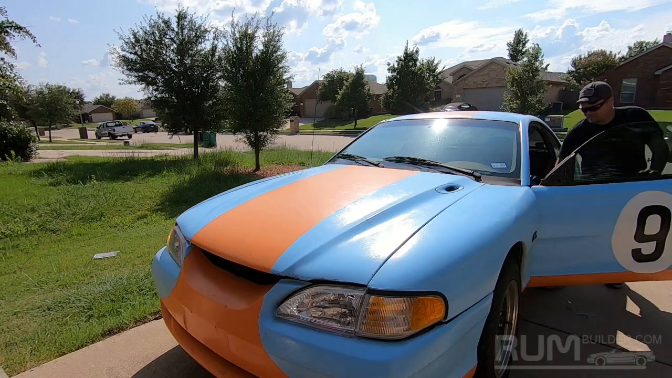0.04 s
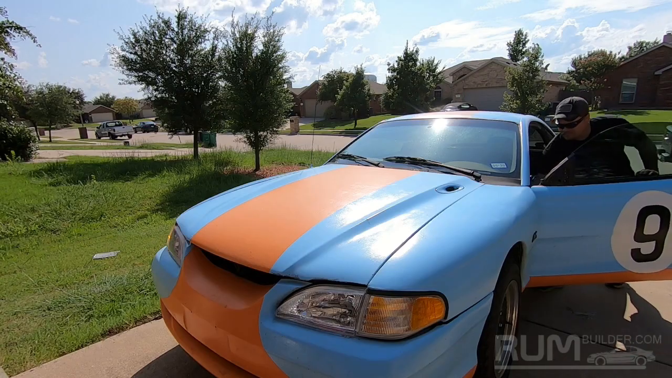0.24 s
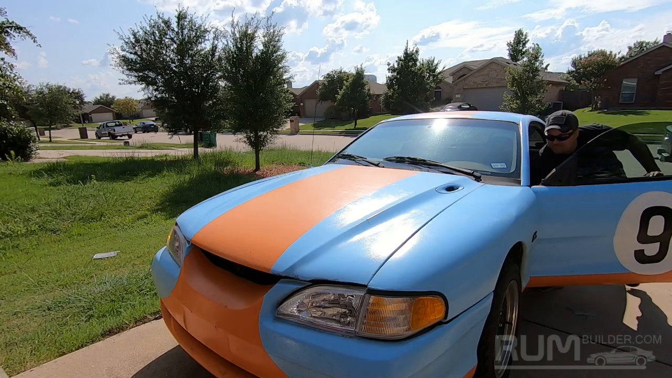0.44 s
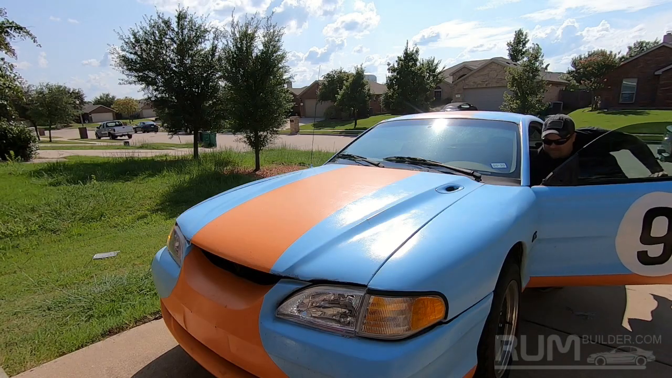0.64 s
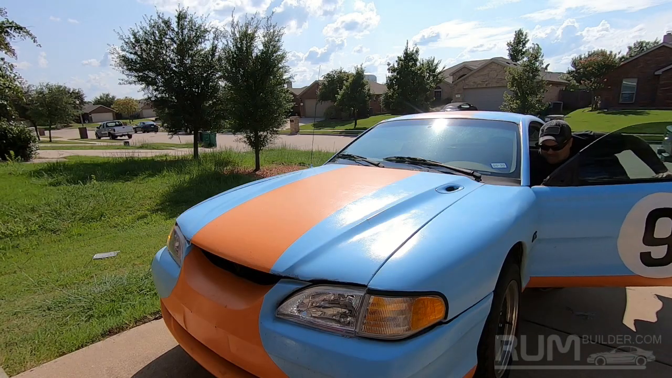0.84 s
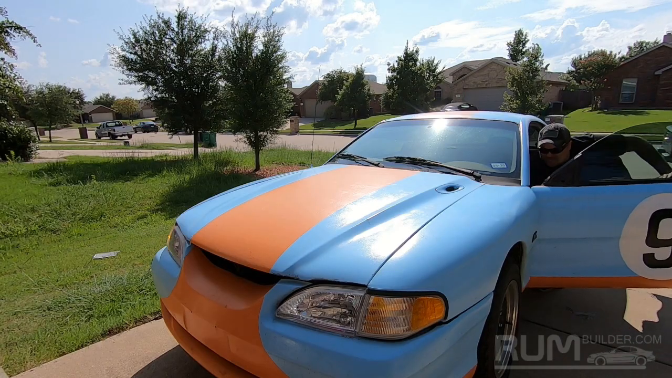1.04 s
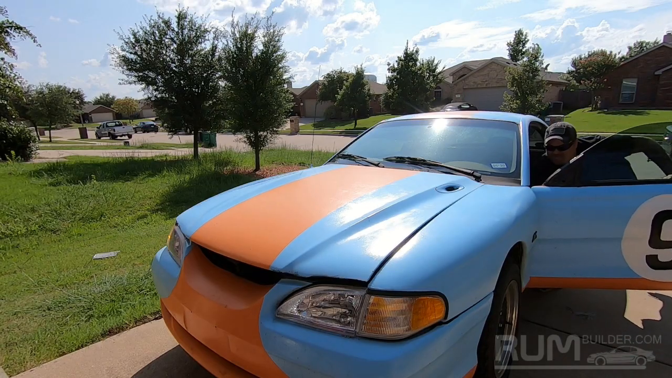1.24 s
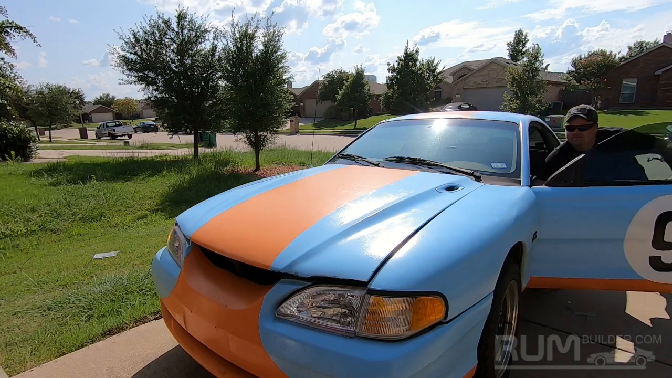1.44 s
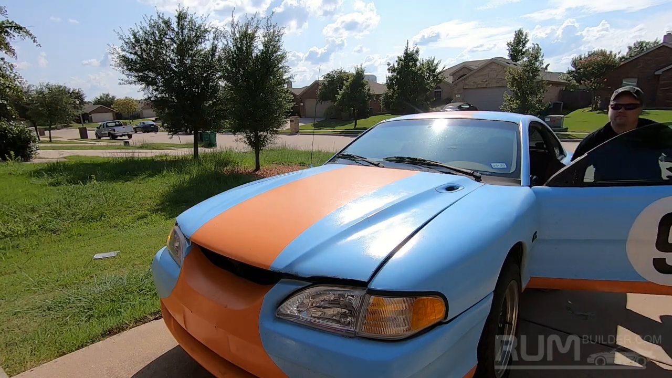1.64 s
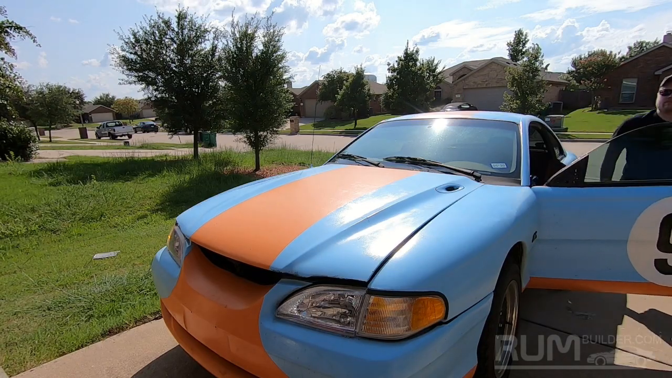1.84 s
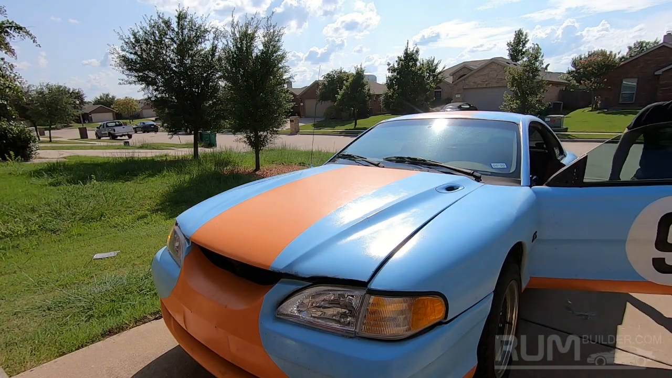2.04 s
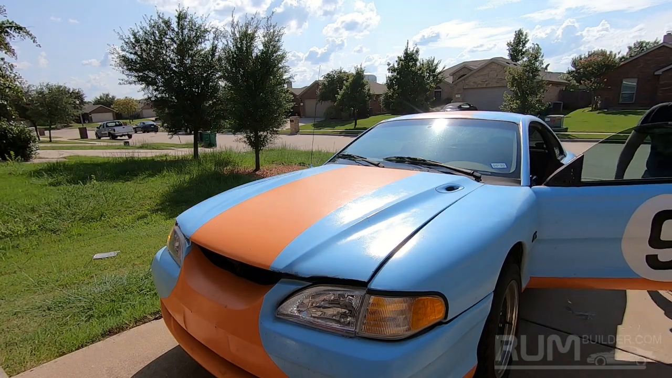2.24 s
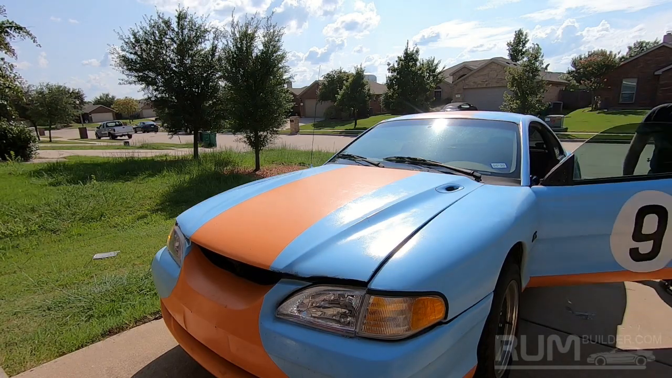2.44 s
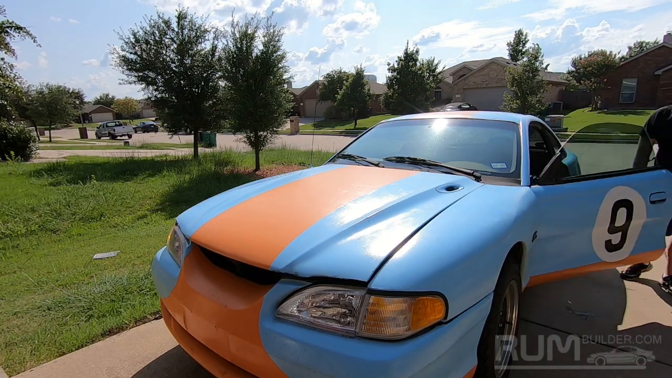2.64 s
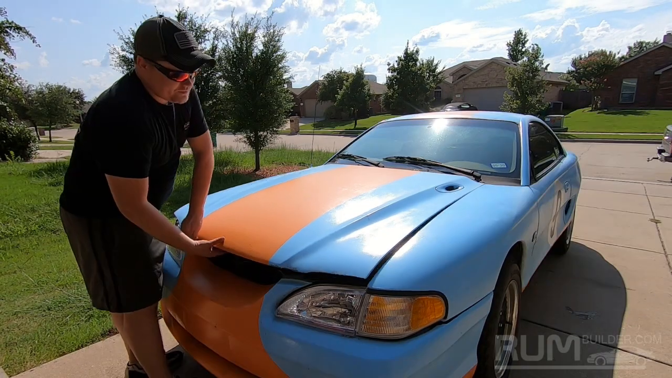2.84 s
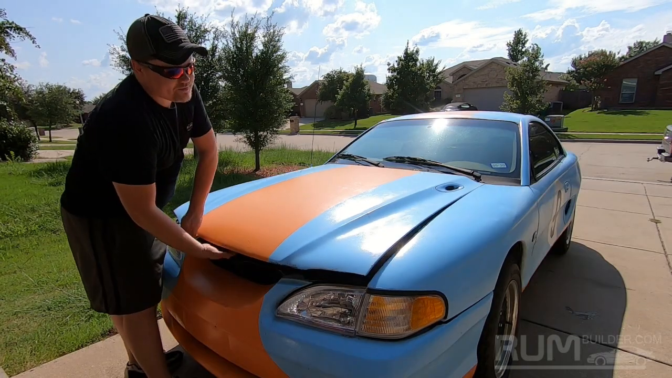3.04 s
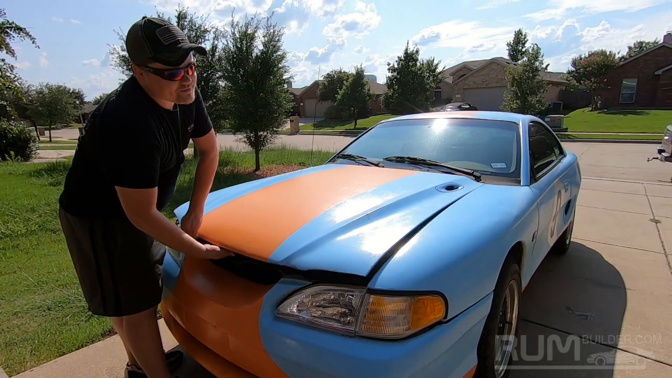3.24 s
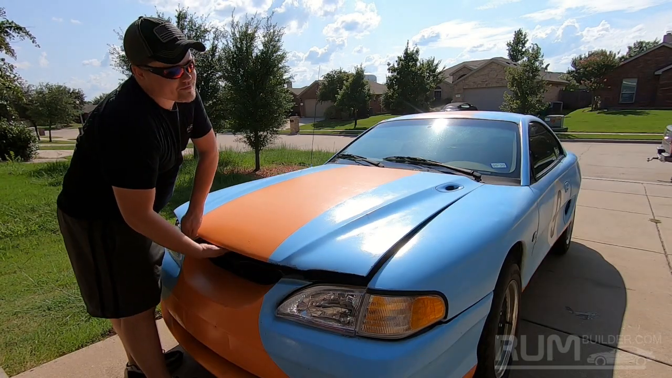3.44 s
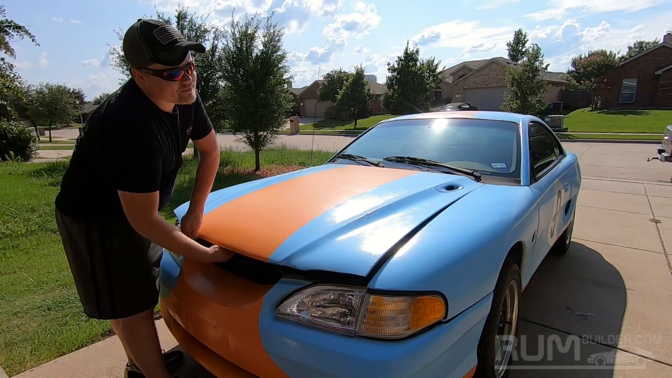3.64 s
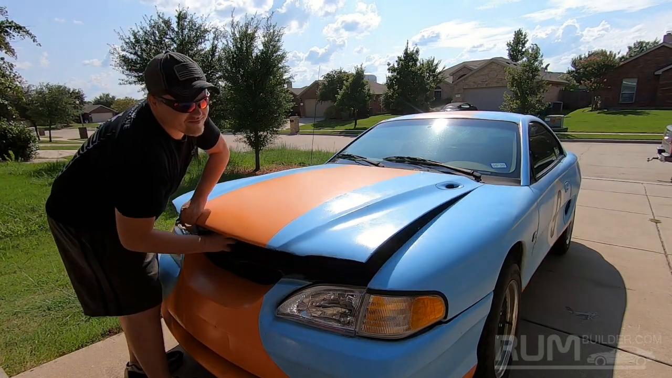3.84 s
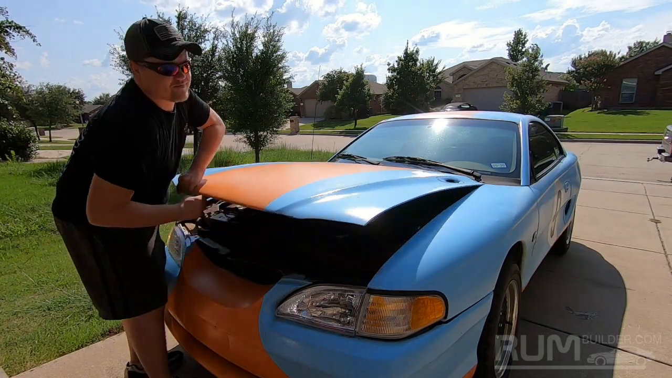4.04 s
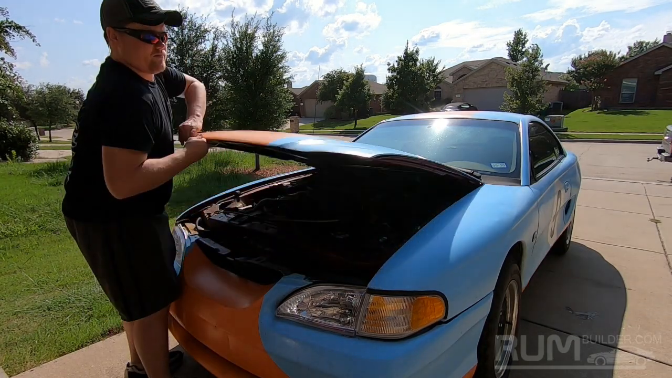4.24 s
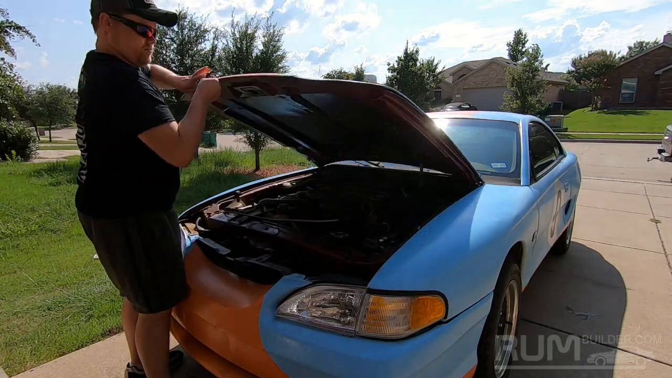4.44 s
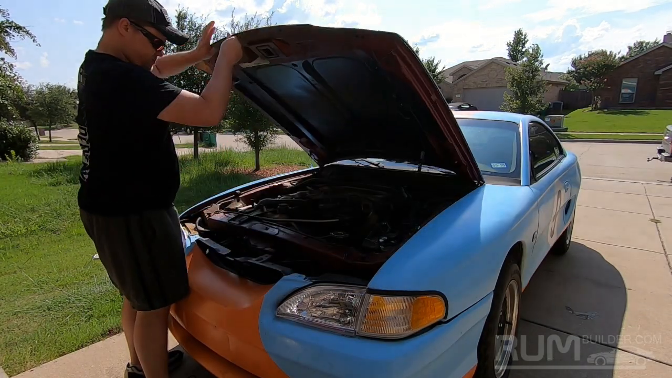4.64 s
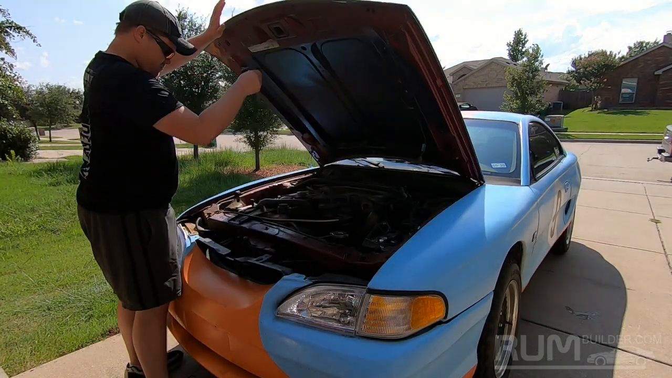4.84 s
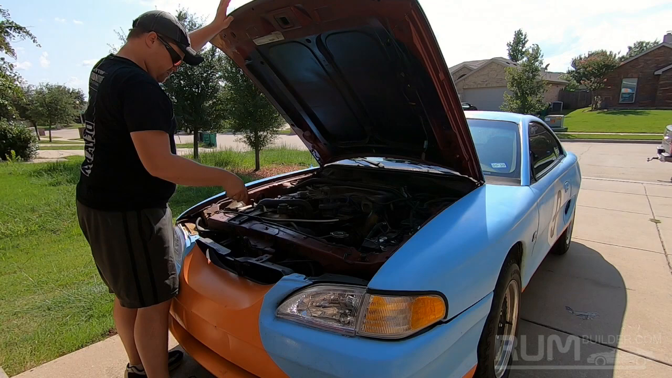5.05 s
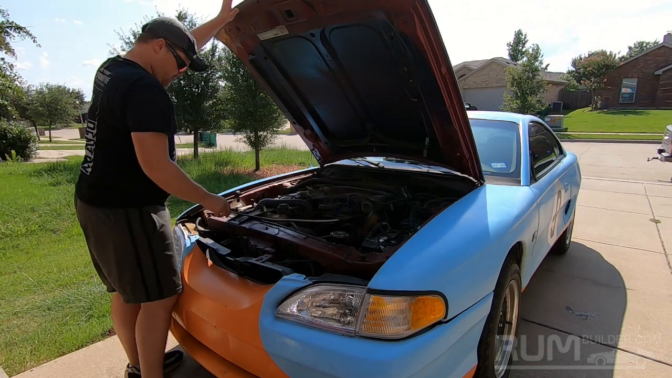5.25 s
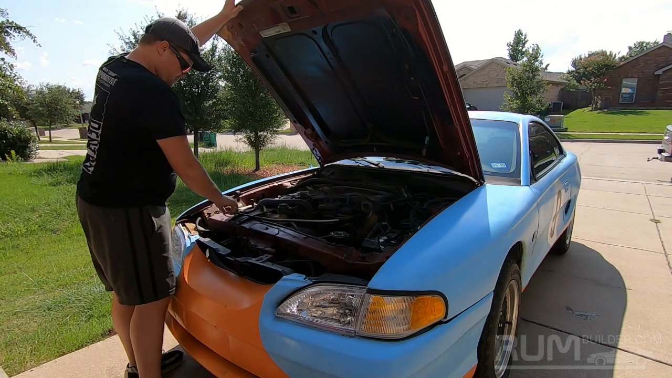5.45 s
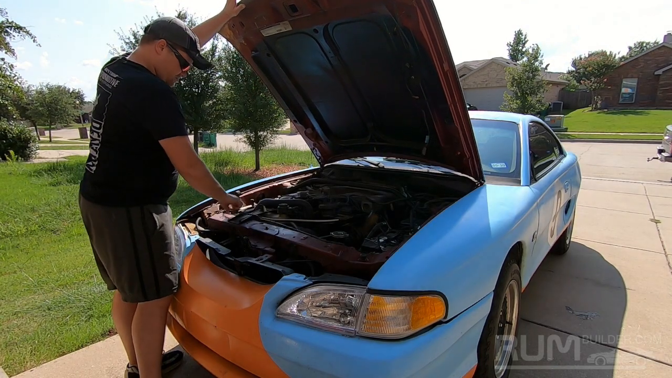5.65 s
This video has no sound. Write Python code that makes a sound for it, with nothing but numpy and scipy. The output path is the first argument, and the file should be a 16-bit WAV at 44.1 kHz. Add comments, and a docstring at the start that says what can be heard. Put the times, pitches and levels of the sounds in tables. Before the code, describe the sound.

Quiet drive with faint far traffic, low hum and soft wind rumble. Small dull touches on a car sill, then a short cable scrape and one very loud steel latch bang with a shivering spring. Soft door bumps follow, then a second, weaker clunk and rattle. Fingers fumble at the safety catch with knocks and thin squeaks; finally a prop rod clicks. Close single-microphone sound, almost mono.

```python
"""Opening a car bonnet

A car stands on a quiet suburban drive. Its release cable is pulled and the latch springs open with a bang;
then hands rattle the bonnet on its safety catch, lift it and free the prop rod. Random shakes drive resonances
for the knocks, and uneven slips do so for the rubbing; squeaks are gliding tones. Shaped noise makes far
traffic, hum, insects and gusts, beside a drone; houses answer with a fading noise tail."""
import sys
import numpy as np
from scipy import signal
from scipy.fft import rfft, irfft, next_fast_len
from scipy.io import wavfile
from scipy.ndimage import map_coordinates

SR = 44100
rng = np.random.default_rng(int(sys.argv[2]) if len(sys.argv) > 2 else 0)


def pcm_store(signal):
    """Save signal as 16-bit PCM."""
    levels = np.round(np.clip(np.atleast_2d(signal), -1, 1) * 32767)
    wavfile.write(sys.argv[1], SR, levels.astype(np.int16).T)


N = 251491

# Spectra of the steady sounds, relative: (f/Hz, level/dB per Hz)
TRAFFIC_SPECTRUM = [(20, -4), (40, -10.5), (60, -13.5), (110, -12.5), (200, -19.5), (400, -17), (800, -18),
                    (1200, -20.5), (1700, -27.5), (3000, -32.5), (6000, -36), (15800, -43)]
GUST_SPECTRUM = [(1, -4.5), (3, 3), (8, -12), (20, -33.5), (40, -47.5), (80, -120)]
SIDE_HISS_SPECTRUM = [(15, -62), (25, -17), (4450, -10.5), (5670, -6), (12100, -4), (15800, -9.5)]
# How loud the air sounds are over time: (t/s, level/dB)
DRONE_LEVEL = [(0, -58), (1, -62), (2, -64.5), (2.69, -62.5), (2.75, -68), (4, -62), (4.3, -60.5),
               (5.7, -58.5)]
INSECT_LEVEL = [(0, -86), (2.5, -83.5), (3.6, -102), (5.7, -88)]
GUST_LEVEL = [(0, -39.5), (0.3, -54), (0.97, -32.5), (1.22, -46.5), (1.45, -33), (2.02, -36.5),
              (2.14, -47.5), (2.75, -41), (2.86, -54.5), (3.13, -33.5), (3.37, -36.5), (3.76, -43),
              (3.91, -49.5), (4.6, -37.5), (5.03, -60.5), (5.7, -58.5)]
# Bands of hum above the drone: (f/Hz, width/Hz, level/dB)
HUM_BANDS = [(149, 8, -0.5), (237.2, 10, -4.5), (289, 2.5, -7), (745, 20, -12.5)]
# How fast the answer of the houses fades by 60 dB: (f/Hz, t60/s)
HOUSE_FADE = [(100, .5), (600, 0.46), (2000, 0.37), (6000, 0.33), (14000, 0.33)]
# Treble-leaning difference of the two channels: (f/Hz, side level re mid/dB)
CHANNEL_DIFFERENCE = [(25, -45), (1000, -53.5), (4000, -35.5), (12000, -28)]
# Single contacts: (t/s, middle steel level/dB, dullness = low steel over middle/dB,
# panel level/dB, panel thud level/dB)
SILL_HITS = [(0.0266, -59, 2.1, -61, -55), (0.0828, -59, 5.6, -35, -51.5), (0.1236, -73, 1.5, -52.5, -49),
             (0.1744, -72, 7, -46, -63)]
LATCH_HITS = [(1.1655, -9.5, 1.5, -19.5, -26.5), (1.3337, -50, 8, -32, -55), (1.3786, -43.5, 1.5, -37, -81),
              (1.4477, -61, 9.5, -40.5, -49.5), (1.4741, -62, 9, -45.5, -54), (2.8047, -46, 1, -45, -48.5),
              (2.88, -29.5, 6.5, -24, -41), (3.0496, -71.5, 3, -57, -46)]
DOOR_HITS = [(1.6502, -61.5, 8.7, -44, -56.5), (1.8423, -58, 4, -64.5, -62.5),
             (2.0911, -73, 1.6, -40.5, -50), (2.6284, -68, 1.7, -50.5, -51),
             (3.3116, -73.5, 9.6, -51.5, -60.5)]
CATCH_HITS = [(3.394, -50.5, 5.5, -40, -49.5), (3.7579, -55.5, 5.5, -46, -58), (3.7875, -65, 8, -69, -79),
              (3.8144, -63, 10, -53, -81), (3.8725, -39.5, -4.5, -43, -53), (3.905, -56, 9, -47, -47.5),
              (4.02, -59, 11, -41.5, -67), (4.035, -60, 14.5, -43, -52.5), (4.1106, -45.5, 11, -44, -59),
              (4.2105, -32.5, -9, -47, -68), (4.229, -47, -7.5, -57, -55)]
ROD_HITS = [(4.6513, -59.5, -3, -62, -60), (4.8994, -68, -2.5, -67.5, -61),
            (5.1873, -63.5, -7, -65.5, -68.5), (5.2599, -39.5, 0.5, -36, -65), (5.2655, -40.5, 2, -37, -70),
            (5.283, -48, -8, -52, -70)]
# Rattles of the bonnet on its hook: the five contact columns for the first touch, then
# what each rebound loses: (steel loss/dB, panel loss/dB, thud loss/dB)
LATCH_RATTLES = [(1.1754, -26, 1.5, -22.5, -34, 4.5, 11, 4),
                 (2.8875, -32.5, 1.2, -26, -35.5, 3.1, 1.5, 0.5)]
CATCH_RATTLES = [(3.938, -55.5, 14, -25.5, -37, 14, 8.7, 6.7)]
# Resonances of each part, relative: (f/Hz, width/Hz, level/dB)
SILL_TRIM = [(132, 67, -1), (243, 74, 3), (376, 110, 2.5), (476, 145, -2), (730, 110, -6),
             (1330, 210, -5.5)]
LATCH_STEEL = [(1518, 24, -6.5), (1643, 24, 9), (1793, 62, 4.5), (2040, 110, 3.5), (2097, 130, -2.5),
               (2550, 70, 5), (2846, 77, -4.5), (3570, 450, 0.5), (4030, 62, -1), (4120, 66, 3.5),
               (4640, 92, -8), (6204, 59, -8.5), (7080, 400, -0.5), (7700, 75, -7), (8600, 600, -3.5),
               (9400, 57, -3), (13120, 480, -8.5), (13700, 300, -10)]
CLOSED_BONNET = [(85, 80, -14.5), (135, 72, -9.5), (218, 60, -10), (325, 88, -6.5), (564, 51, -4.5),
                 (638, 45, -7.5), (755, 38, 1.5), (788, 100, 0), (897, 180, -4), (1081, 58, -1.5)]
LATCH_SPRING = [(1910, 200, 2), (2050, 200, 2.5), (590, 400, -1), (4200, 350, -9.5)]
DOOR_SKIN = [(129, 97, 5.5), (224, 97, 6), (385, 22, 9), (484, 54, -1.5), (704, 520, -8), (1250, 1800, -60)]
CATCH_STEEL = [(1610, 190, -3.5), (2090, 170, 4.5), (2403, 580, -6.5), (2990, 120, 3.5), (3830, 310, -10),
               (4800, 860, 1.5), (5270, 63, -13), (6690, 120, 9.5), (7540, 240, -0.5), (8510, 180, 4.5),
               (10887, 69, -20)]
LIFTED_BONNET = [(85, 40, -5), (154, 48, -2), (185, 32, -2.5), (246, 40, -1.5), (323, 38, -3.5),
                 (406.7, 13.6, 3), (503, 34, -2.5), (591, 34, -1.5), (965, 270, -9), (1058, 37, -4.5),
                 (1530, 1200, -12.5)]
ROD_STEEL = [(1763, 90, 0), (3300, 52, -8), (4210, 118, -2), (4550, 39, -9.5), (4650, 61, 7),
             (6660, 32, -13), (7280, 77, -10), (7850, 57, -12)]
ROD_CLIP = [(197.8, 383, -30), (570, 470, -13), (1010, 99, 13)]
# Spectra of the shakes for middle, low and high steel, panel and thud, one list each: (f/Hz, level/dB)
SHAKE_SPECTRA = [
    [(2300, -31), (3000, 2), (6000, -6), (7500, -30)],
    [(1000, -30.5), (1350, 2), (3000, -3), (3900, -32.5)],
    [(4800, -31), (6000, 3.5), (11000, -3), (14000, -8), (16000, -17)],
    [(190, -31), (280, -1.5), (1350, -2), (2500, -28), (5000, -61)],
    [(30, -18), (60, 0), (280, 4), (420, -31.5), (2000, -83)],
]
# Rubbing strokes: (start t/s, end t/s, first level/dB, last level/dB)
CABLE_STROKES = [(1.1, 1.168, -58.5, -37.5), (2.79, 2.855, -58, -57), (2.86, 2.882, -49.5, -34.5)]
SPRING_STROKES = [(1.19, 1.64, -48.5, -66)]
FINGER_STROKES = [(3.735, 3.8, -59.5, -61.5), (3.83, 3.94, -61, -55), (4.0, 4.18, -65, -66),
                  (4.185, 4.21, -55.5, -51), (4.22, 4.38, -69, -64.5)]
# Whining dry pivots: (start t/s, length/s, level/dB, first f/Hz, last f/Hz)
SQUEAKS = [(3.813, 0.061, -65, 7400, 7600), (3.818, 0.051, -62, 8150, 8350), (4.016, .09, -70, 6600, 6640),
           (4.202, 0.23, -62, 4780, 4300), (4.214, 0.227, -71, 6620, 6500), (4.289, 0.13, -60, 2500, 2970),
           (4.293, 0.094, -63, 2230, 2360), (4.36, 0.134, -64, 2290, 2140)]

TOP_HZ = 15800  # band limit
TRAFFIC_DB, SWELL_DB = -60, 0.7  # mean level of the far road, size of its swell
DRONE_HZ = 74  # middle of its wandering pitch
REBOUNDS, REBOUND_S = 3, 0.019  # rebounds per rattle, time between them
STROKE_EDGE_DB_PER_S = 1500  # how fast a stroke sets in and lets go
POP_S, POP_DB, POP_DECAY_S = 2.6931, -40, 0.009
HIGH_DULLS, HIGH_GROWS = 0.27, 0.12  # dB the high steel loses per dB of dullness and per dB of weaker blow
CRACK_T60 = 0.008  # fade time of the first hard touch of bare metal, s


def amp(db):
    """Turn decibels into gain."""
    return 10 ** (np.asarray(db) / 20)


def unit(x):
    """Scale a sound to rms 1."""
    return x / np.sqrt(np.mean(x ** 2) + 1e-20)


def along(points, hz):
    """Read values between (f/Hz, value) points on a log axis."""
    f, v = np.transpose(points)
    return np.interp(np.log(hz + 1), np.log(f + 1), v)


def gain_over_time(points):
    """Turn (t/s, level/dB) points into one gain per sample."""
    s, db = np.transpose(points)
    return amp(np.interp(np.arange(N) / SR, s, db))


def wobble(rate):
    """A smooth random curve through 'rate' random points a second."""
    knots = rng.standard_normal(int(N * rate / SR) + 4)
    return map_coordinates(knots, [np.arange(N) * rate / SR])


def filtered(x, response):
    """Reshape x by a complex response to frequency."""
    m = next_fast_len(x.shape[-1] + 8192)
    spectrum = rfft(x, m) * response(np.fft.rfftfreq(m, 1 / SR))
    return irfft(spectrum, m)[..., :x.shape[-1]]


def modes(table):
    """A body answers a push most strongly at its resonances, and only after the push."""
    def response(f):
        total = 0
        for k, (centre, width, db) in enumerate(table):
            damping = 1j * f * width
            total = total + (-1) ** k * amp(db) * damping / (centre ** 2 - f ** 2 + damping)
        return total
    return response


def noise(response):
    """Coloured noise of rms 1."""
    return unit(filtered(rng.standard_normal(N), response))


def contacts(table, steel, panel, carpet_db, hard_s, soft_s, steel_t60, panel_t60, crack_db):
    """Each contact chatters briefly and rings three groups of steel modes; another shake rings the panel."""
    out, t = np.zeros(N + SR), np.arange(SR // 4) / SR
    f, start = np.fft.rfftfreq(SR // 2, 1 / SR), slice(0, SR // 80)
    spectra = np.array([amp(along(g, f)) for g in SHAKE_SPECTRA])
    cushion = modes(panel)(f) / (1 + 1j * f / 2500) ** 2  # a cushioned blow carries little treble
    knock = cushion * (1j * f / (200 + 1j * f)) ** 2  # the panel's knock lies above its thud
    thud = cushion / (1 + 1j * f / 300) ** 2
    lives = np.array([steel_t60, 1.4 * steel_t60, 1.2 * steel_t60, panel_t60, 1.1 * panel_t60])
    rises = np.array([hard_s, hard_s, hard_s, soft_s, 2 * soft_s])
    envelope = amp(-60 * t / lives[:, None]) * (1 - np.exp(-t / rises[:, None]))
    push = 1.3 * t / soft_s * np.exp(1 - t / soft_s)  # the blow itself
    for s, steel_db, dull_db, panel_db, thud_db in table:
        high_db = steel_db - HIGH_DULLS * dull_db + HIGH_GROWS * steel_db
        levels = [steel_db, steel_db + dull_db, high_db, panel_db, thud_db]
        rough = irfft(rfft(rng.standard_normal((5, SR // 2))) * spectra)[:, :len(t)]
        shakes = rough * envelope
        shakes[:3] *= 1 + amp(crack_db - 60 * t / CRACK_T60)
        shakes[3:] += push * np.std(rough[3:], axis=1, keepdims=True)
        # random scatter: no two blows land alike
        struck = [(hz, width, db + rng.normal(0, 2.5)) for hz, width, db in steel]
        ring = modes(struck)(f) + amp(carpet_db)  # named modes stand on a dense carpet of small ones
        parts = irfft(rfft(shakes, SR // 2) * [ring, ring, ring, knock, thud])
        # over its first 1/80 s each part lies 5 dB below its table level
        parts *= amp(np.subtract(levels, 5))[:, None] / np.std(parts[:, start], axis=1, keepdims=True)
        out[round(s * SR):][:SR // 2] += parts.sum(axis=0)
    return out[:N]


def rattled(table):
    """A rattle is a first contact and evenly spaced rebounds that each lose a little."""
    hits = []
    for s, steel_db, dull_db, panel_db, thud_db, steel_loss, panel_loss, thud_loss in table:
        for k in range(REBOUNDS + 1):
            hits.append((s + k * REBOUND_S, steel_db - k * steel_loss, dull_db,
                         panel_db - k * panel_loss, thud_db - k * thud_loss))
    return hits


def strokes(table):
    """Each stroke sets in fast, drifts from its first level to its last and lets go."""
    t, total = np.arange(N) / SR, np.zeros(N)
    for start, end, first_db, last_db in table:
        outside_s = np.maximum(0, np.maximum(start - t, t - end))
        drift_db = np.interp(t, [start, end], [first_db, last_db])
        total += amp(drift_db - STROKE_EDGE_DB_PER_S * outside_s)
    return total


def rubbing(table, body, lumpy_db, carpet_db):
    """Uneven slips excite a body's resonances, with the treble softened."""
    slips = rng.standard_normal(N) * amp(lumpy_db * wobble(130))
    rubbed = filtered(slips, lambda f: (modes(body)(f) + amp(carpet_db)) / (1 + (f / 6500) ** 4))
    return strokes(table) * unit(rubbed)


def traffic():
    """A far road: mostly low noise that swells slightly."""
    return amp(TRAFFIC_DB + SWELL_DB * wobble(3.0)) * noise(lambda f: amp(along(TRAFFIC_SPECTRUM, f)))


def machine_drone():
    """A low sine whose level and pitch waver."""
    phase = 2 * np.pi * np.cumsum(DRONE_HZ + 2.0 * wobble(10)) / SR
    return gain_over_time(DRONE_LEVEL) * amp(2.4 * wobble(13)) * np.sin(phase)


def machine_hum():
    """Noise through narrow resonances, cut off at 900 Hz."""
    return amp(-65.5) * noise(lambda f: modes(HUM_BANDS)(f) * (f < 900))


def insects():
    """A thin, far band of hiss around 4850 Hz."""
    return gain_over_time(INSECT_LEVEL) * noise(lambda f: modes([(4850, 400, 0)])(f) ** 2)


def gusts():
    """Slow wind pressure on the microphone: very low noise that rises and falls."""
    return gain_over_time(GUST_LEVEL) * noise(lambda f: amp(along(GUST_SPECTRUM, f)))


def side_hiss():
    """A very faint hiss, opposite in the two channels."""
    return amp(-84.0) * noise(lambda f: amp(along(SIDE_HISS_SPECTRUM, f)))


def sill():
    """Small contacts on the sill ring steel and trim."""
    return contacts(SILL_HITS, LATCH_STEEL, SILL_TRIM, carpet_db=8, hard_s=0.0013, soft_s=0.00077,
                    steel_t60=0.11, panel_t60=0.13, crack_db=-15)


def houses(x):
    """The street answers with a noise tail in which each frequency dies at its own speed."""
    hz, t, z = signal.stft(rng.standard_normal(SR), SR, nperseg=256)
    fade = amp(-60 * t / along(HOUSE_FADE, hz)[:, None])
    tail = signal.istft(z * fade, SR, nperseg=256)[1]
    delayed = np.pad(x, (400, 0))  # 400 samples, about 9 ms
    return signal.fftconvolve(delayed, tail / np.linalg.norm(tail))[:N]


def release_cable():
    """The dragged cable slips unevenly and excites the latch steel."""
    return rubbing(CABLE_STROKES, LATCH_STEEL, lumpy_db=2.7, carpet_db=3.6)


def latch():
    """The latch bangs and the bonnet shakes on its hook: ringing steel and panel."""
    return contacts(LATCH_HITS + rattled(LATCH_RATTLES), LATCH_STEEL, CLOSED_BONNET, carpet_db=-4.5,
                    hard_s=0.0008, soft_s=0.00037, steel_t60=0.06, panel_t60=0.11, crack_db=3)


def latch_spring():
    """The spring shivers on: uneven slips through its resonances, fading."""
    return rubbing(SPRING_STROKES, LATCH_SPRING, lumpy_db=1.5, carpet_db=-8)


def door():
    """Soft contacts on the door ring its skin, with dull steel."""
    return contacts(DOOR_HITS, LATCH_STEEL, DOOR_SKIN, carpet_db=8, hard_s=0.0042, soft_s=0.0012,
                    steel_t60=0.085, panel_t60=0.19, crack_db=-25)


def pop():
    """One faint dry pop: a small sudden step that dies away within a few milliseconds."""
    t = np.arange(N) / SR - POP_S
    return amp(POP_DB) * (t > 0) * np.exp(-np.maximum(t, 0) / POP_DECAY_S)


def safety_catch():
    """Knocks and a rattle on the safety catch ring its steel and the lifted bonnet."""
    return contacts(CATCH_HITS + rattled(CATCH_RATTLES), CATCH_STEEL, LIFTED_BONNET, carpet_db=-9.0,
                    hard_s=0.0012, soft_s=0.00042, steel_t60=0.055, panel_t60=0.15, crack_db=6)


def groping_fingers():
    """Fingers grope for the catch: uneven slips excite its steel."""
    return rubbing(FINGER_STROKES, CATCH_STEEL, lumpy_db=2.5, carpet_db=3)


def squeaks():
    """Dry pivots and springs whine on a rough, gliding pitch."""
    out, rough, waver = np.zeros(N), unit(0.35 + wobble(420)), 1 + 0.012 * wobble(64)
    for s, length, db, first_hz, last_hz in SQUEAKS:
        u = np.linspace(0, 1, round(length * SR))  # progress from 0 to 1
        span = slice(round(s * SR), round(s * SR) + len(u))
        pitch_hz = (first_hz + (last_hz - first_hz) * u) * waver[span]
        swell = np.sin(np.pi * u ** 0.74)
        grain = np.roll(rough, rng.integers(N))[span]
        out[span] += amp(db) * swell * grain * np.sin(2 * np.pi * np.cumsum(pitch_hz) / SR)
    return out


def prop_rod():
    """The rod knocks in its clip: light ringing steel and a short clip sound."""
    return contacts(ROD_HITS, ROD_STEEL, ROD_CLIP, carpet_db=-3, hard_s=0.00077, soft_s=0.0021,
                    steel_t60=0.046, panel_t60=0.016, crack_db=3.0)


def scene():
    """One microphone feeds both channels; they differ only faintly, most in the treble."""
    air = traffic() + machine_drone() + machine_hum() + insects() + gusts()
    car = (sill() + release_cable() + latch() + latch_spring() + door()
           + safety_catch() + groping_fingers() + squeaks() + prop_rod())
    mid = car + amp(-14.5) * houses(car) + air + pop()
    side = side_hiss() + filtered(mid, lambda f: 1j * amp(along(CHANNEL_DIFFERENCE, f)))
    return np.array([mid + side, mid - side])


def record(dry):
    """Peaks are rounded off towards full scale; then all above the band limit is removed."""
    held = dry / (1 + np.abs(dry) ** 8) ** (1 / 8)
    return filtered(held, lambda hz: hz < TOP_HZ)


dry = scene()
out = record(dry)
pcm_store(out)
```